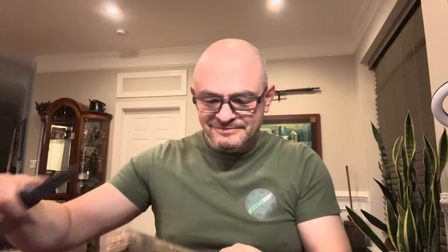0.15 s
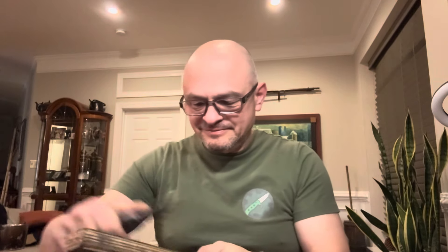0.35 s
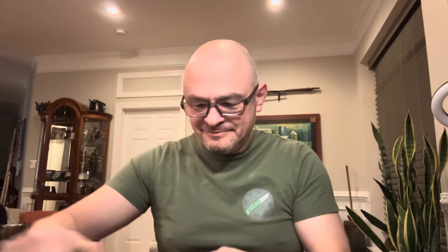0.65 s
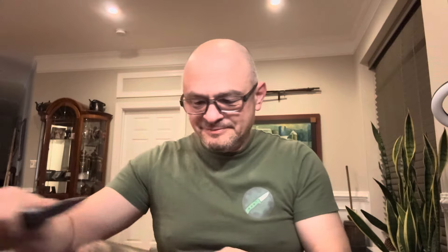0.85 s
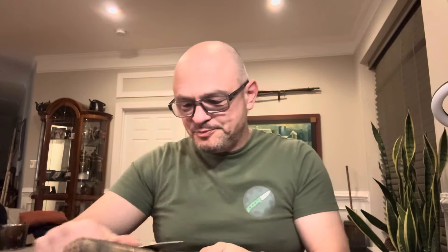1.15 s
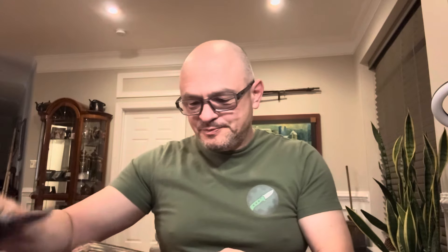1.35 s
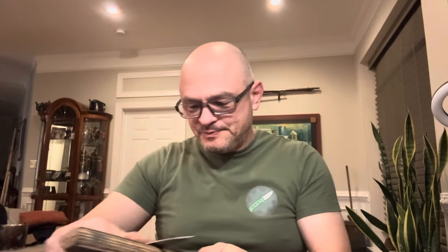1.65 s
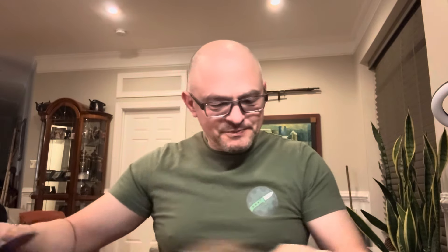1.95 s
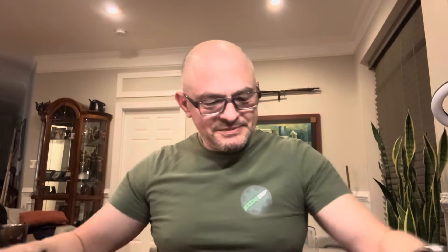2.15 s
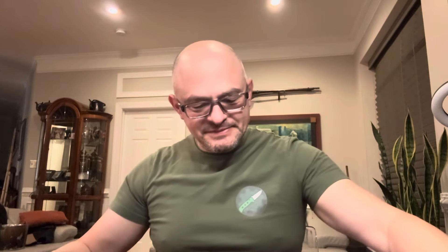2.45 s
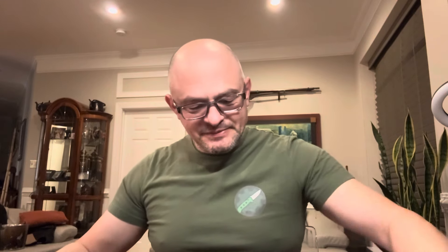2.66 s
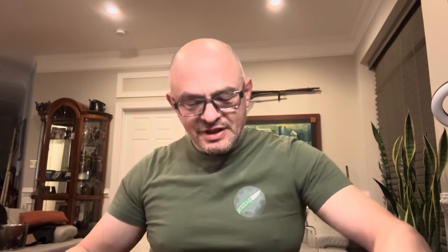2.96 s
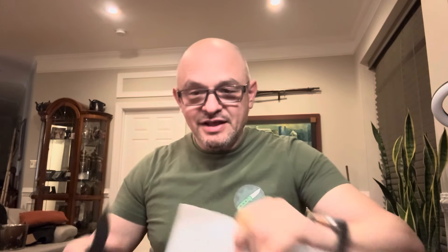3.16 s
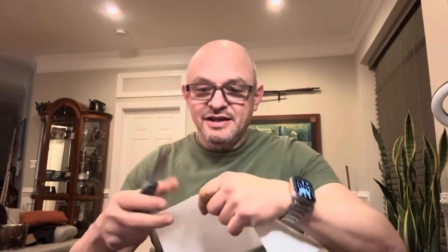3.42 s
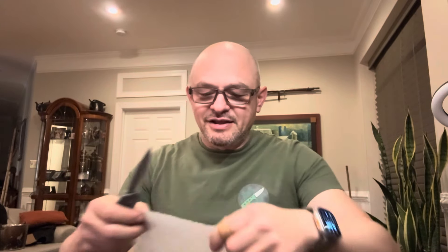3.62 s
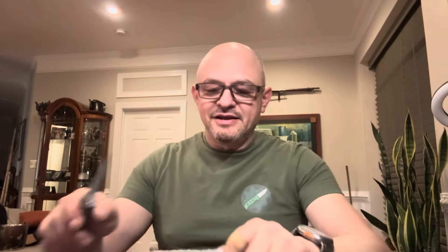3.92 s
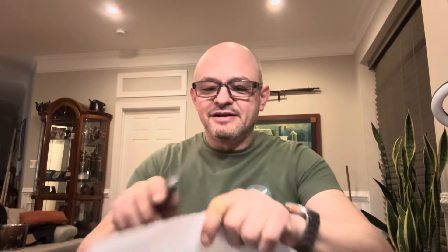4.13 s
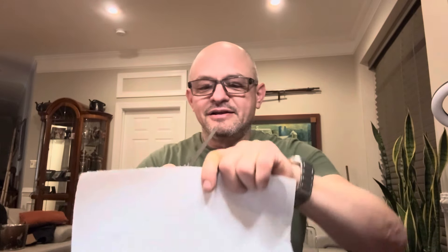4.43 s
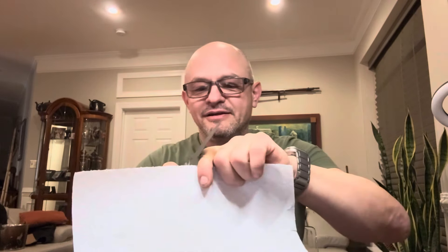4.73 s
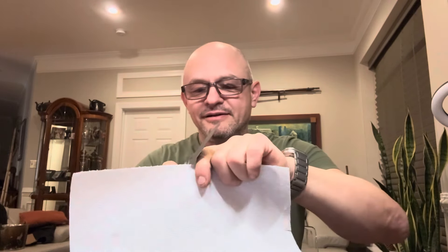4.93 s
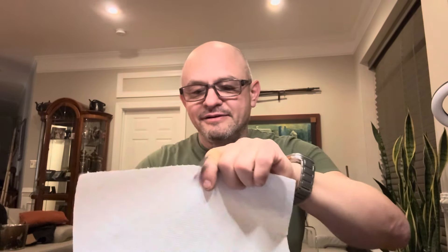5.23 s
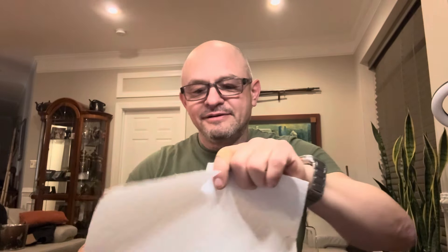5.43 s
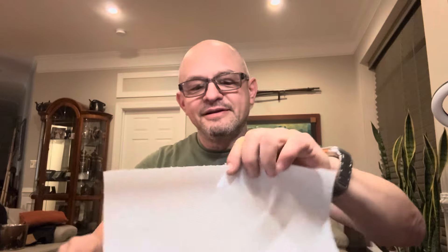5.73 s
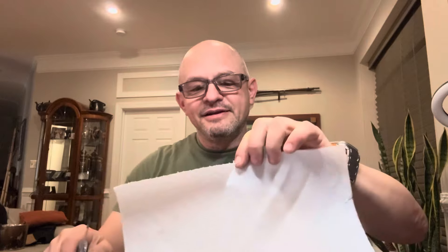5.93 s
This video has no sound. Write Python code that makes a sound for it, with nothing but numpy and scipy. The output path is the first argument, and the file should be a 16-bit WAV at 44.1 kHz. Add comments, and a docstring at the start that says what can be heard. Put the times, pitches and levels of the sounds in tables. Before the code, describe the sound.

Near stereo microphone in a furnished room: bright short blade clicks, each followed by a fine gritty hiss ending in a small flick. Then two quick wooden knocks as a block lands, heel first and edge second, with a rattle. Loose paper towel is handled in crisp crackling bursts. After a quiet gap a blade rasps through it with tiny snaps, leaving a barely audible ring over low room noise.

```python
"""A knife is stropped on a wooden block close to a two-port microphone in a quiet living room: the blade clicks
on the strop (ringing modes) and hisses along the leather (coloured grit noise). The block is put on the table,
heel then edge (struck modes), and the knife is laid down with a rattle (rattling noise). A paper towel is
picked up and rustled (clumped noise, low flapping), then nicked and sliced, with single snaps and a last
lingering ring. Room tone (noise) and a thin wavering whine (sines) lie under it all."""
import sys
import numpy as np
from scipy import signal
from scipy.fft import rfft, irfft, next_fast_len
from scipy.io import wavfile
from scipy.ndimage import uniform_filter1d

SR = 44100
rng = np.random.default_rng(int(sys.argv[2]) if len(sys.argv) > 2 else 0)


def log_audio(samples):
    """Write samples as a 16-bit WAV file to the path given in sys.argv[1]."""
    # one column per channel
    frames = np.atleast_2d(samples).T
    # limit to full scale, then quantise
    limited = np.clip(frames, -1, 1)
    pcm = np.round(limited * 32767).astype(np.int16)
    wavfile.write(sys.argv[1], SR, pcm)


def undo_db(level):
    """Turn decibels back into plain size, where 20 dB means ten times bigger."""
    steps = np.asarray(level, float) / 20
    return 10 ** steps


N = 268172
LEAD = 4410  # samples of scene before time zero

# level difference between the ports: f/Hz, left minus right/dB
PORT_LEAN = [(60, -3), (250, -3), (600, -4.5), (2000, 1), (4500, -6.5), (9000, 0.5)]


def evened(x):
    """Scales to rms 1."""
    return x / np.sqrt(np.mean(x ** 2) + 1e-20)


def read(points, hz):
    """Table value on a log-frequency axis."""
    f, value = np.transpose(points)
    return np.interp(np.log(hz + 1), np.log(f + 1), value)


def add(mix, s, sound):
    """Mixes a sound in at time s."""
    part = mix[LEAD + round(s * SR):][:len(sound)]
    part += sound[:len(part)]


def coloured(x, points, tilt_db_per_octave=0):
    """Filters by a spectrum, tilted about 3 kHz; rms 1."""
    hz = np.fft.rfftfreq(len(x), 1 / SR)
    gain_db = read(points, hz) + tilt_db_per_octave * np.log2(hz / 3000 + 0.027)
    return evened(irfft(rfft(x) * undo_db(gain_db), len(x)))


def resonate(x, hz, width_hz):
    """Moving resonance: shifts the curve hz down to zero, smooths, shifts back; rms 1."""
    turn = np.exp(2j * np.pi * np.cumsum(hz) / SR)
    pole = np.exp(-np.pi * width_hz / SR)
    smooth = signal.lfilter([1 - pole], [1, -pole], x / turn)
    return evened((turn * smooth).real)


def ring(modes, contact_s, rise_s, crack_db, crack_s, crack_hz=700):
    """Modes set going by a short blow, plus the broad crack of the contact; peak 1."""
    t = np.arange(SR // 2) / SR
    hz, db, t60_s = np.transpose(modes)[:, :, None]
    body = (undo_db(db - 60 * t / t60_s) * np.sin(2 * np.pi * hz * t)).sum(0)
    t_blow = t[:800]
    blow = t_blow * np.exp(-t_blow / contact_s)
    sound = signal.fftconvolve(body, blow)
    sound *= 1 - np.exp(-np.arange(len(sound)) / SR / rise_s)  # the parts settle into each other
    sound /= abs(sound).max()
    crack = t_blow / crack_s * np.exp(1 - t_blow / crack_s) * rng.standard_normal(800)
    high_pass = signal.butter(2, 2 * crack_hz / SR, "high")
    sound[:800] += undo_db(crack_db) * signal.lfilter(*high_pass, crack)
    return sound / abs(sound).max()


def clicks():
    """Each face of the blade weights the same modes differently; direct sound and room feed."""
    # blade clicking on the strop, at set-down or at the end of a stroke:
    # t/s, peak level/dB, face of the blade/0-1, room send/dB
    blade_clicks = [(-.012, -13, 0, -10.5), (0.3996, -15.5, 0.3, -10), (1.0177, -15, 1, -14.5),
                    (1.6124, -15, .95, -13), (1.797, -36, 0.39, -18.5)]
    # blade and block ringing: f/Hz, level on face 0/dB, level on face 1/dB, t60/s
    blade = [(317.4, -15, -16, 0.027), (716, -18, -13, 0.03), (795, -13, -11, .025),
             (994, -19, -24.5, 0.054), (1800, -16.5, -26, 0.034), (2680, 2, -18.5, 0.021),
             (2875, 8, -21.5, 0.016), (3036, -7.5, -17, 0.015), (3840, 7.5, -13, .01),
             (4200, -9, 5.5, 0.012), (4360, -15.5, 3, 0.011), (6620, -3, -4, 0.008), (7260, -2, 1, 0.007),
             (8300, -6, -3, 0.006), (9600, -6, -4, .003), (14000, -4, -11.5, 0.0025)]
    near, far = np.zeros((2, LEAD + N))
    for s, db, face, send_db in blade_clicks:
        modes = [(hz, a_db + face * (b_db - a_db), t60_s) for hz, a_db, b_db, t60_s in blade]
        sound = undo_db(db) * ring(modes, .00002, 0.0013, -3.5, 0.0011, crack_hz=2380)
        add(near, s, sound)
        add(far, s, undo_db(send_db) * sound)
    return near, far


def strokes():
    """Fine grit hiss of steel on leather: easing draw, bright flick, dull trailing brush."""
    # blade drawn over the leather: down t/s, lift t/s, draw level/dB, flick level/dB, flick length/s,
    # fading of the trailing brush/(dB/s)
    draws = [(0.418, 0.685, -55, -53.5, 0.08, 54), (1.039, 1.276, -56.5, -54, 0.083, 171),
             (1.635, 1.795, -55.5, -51, 0.01, 175)]
    # hiss spectrum before tilt: f/Hz, relative level/dB
    leather = [(59, -48), (100, 2), (315, 0.5), (452, -30.5), (818, -12), (1450, -40.5), (1910, -8.5),
               (2170, -14.5), (3250, -19), (7770, -7), (9410, -12), (11900, -6.5), (16000, -32)]
    sag_db_per_s, trail_db = 34.5, -63  # pressure eases; after the lift the blade brushes on lightly
    lift_s, trail_s = .011, .26
    # triples: at set-down, at the lift, trailing; levels relative to the hiss
    bright_share = (0.34, 1, .1)
    sing_hz, sing_db = (4060, 3060, 4340), (-16.5, -9, -10.5)  # singing of the blade
    hollow_hz, hollow_db = (800, 900, 1150), (-10, -18, -4)  # hollow of the block
    out = np.zeros(LEAD + N)
    for down_s, up_s, draw_db, flick_db, flick_s, fade_db_per_s in draws:
        t = np.arange(down_s, up_s + trail_s, 1 / SR)
        stage = lambda v: np.interp(t, (down_s, up_s, up_s + 4 * lift_s), v)
        contact = np.exp(-np.maximum(t - up_s, 0) / lift_s)
        flick = np.sin(np.pi * np.clip((t - up_s) / flick_s + 1, 0, 1) * .75) ** 2
        draw = undo_db(draw_db - sag_db_per_s * (t - down_s))
        brush = undo_db(trail_db - fade_db_per_s * (t - up_s))
        level = contact * (draw + undo_db(flick_db) * flick) + (1 - contact) * brush
        grit = rng.standard_normal(len(t)) * undo_db(0.5 * rng.exponential(1, len(t)))
        bright = stage(bright_share)
        hiss = bright * coloured(grit, leather, 0.76) + (1 - bright) * coloured(grit, leather, -4)
        hiss += undo_db(stage(sing_db)) * resonate(grit, stage(sing_hz), 500)
        hiss += undo_db(stage(hollow_db)) * resonate(grit, stage(hollow_hz), 210)
        add(out, down_s, level * hiss * signal.windows.tukey(len(t), .1))
    return out


def knocks():
    """Block on table: a soft blow favours the low table modes, a hard edge wakes all and cracks."""
    # block meeting the table: t/s, peak level before the high-pass/dB, hardness/0-1
    blows = [(2.3512, -11, 0), (2.392, -23, .2), (2.509, -17, 1), (2.547, -24, 0.2), (2.916, -50, 0.4),
             (3.921, -52.5, 0)]
    # table top ringing: f/Hz, level under a hard blow/dB, t60/s
    table_modes = [(76.6, -35.5, 0.45), (114.1, -17, 0.35), (156, -13, 0.25), (167, -7, .24), (237, 0, 0.1),
                   (273, -8, .09), (308.2, -4, 0.1), (378, -6, 0.021), (486, -8.5, .05), (646, -6, 0.06),
                   (748, -8, 0.11), (825, -2.5, 0.045), (1028, -6, .07), (1180, -16.5, 0.054),
                   (1340, -13, 0.05)]
    out = np.zeros(LEAD + N)
    for s, db, hard in blows:
        soft = 1 - hard
        modes = [(hz, d - 7 * soft * max(np.log2(hz / 260), 0), t60_s) for hz, d, t60_s in table_modes]
        add(out, s, undo_db(db) * ring(modes, .00008 + 0.00035 * soft, 0.0033, -8 - 40 * soft, 0.0025))
    return signal.lfilter(*signal.butter(2, 2 * 110 / SR, "high"), out)  # little deep bass in the blows


def clatter():
    """Knife laid down on the table rattles: dense modes as noise dying band by band."""
    # spectrum: f/Hz, relative level/dB
    clatter_colour = [(150, -11.5), (250, -23), (308, -3), (407, -27.5), (761, -10), (860, -17.5),
                      (1060, -8.5), (1580, -27.5), (2490, -27.5), (7570, -33), (8700, -34), (9490, -78),
                      (10500, -47), (13400, -44), (16000, -102)]
    # decay: f/Hz, t60/s
    clatter_decay = [(300, 0.77), (1000, 0.44), (2500, 0.43), (5000, 0.39), (12000, 0.38)]
    hz, t, z = signal.stft(coloured(rng.standard_normal(SR), clatter_colour), SR, nperseg=256)
    decay = undo_db(-60 * t / read(clatter_decay, hz)[:, None])
    tail = signal.istft(z * decay, SR, nperseg=256)[1]
    t = np.arange(len(tail)) / SR
    sharp_start = (1 - np.exp(-t / 0.00077)) * (1 + 2 * np.exp(-t / 0.021))
    out = np.zeros(LEAD + N)
    add(out, 2.508, undo_db(-32) * tail * sharp_start)
    return out


def grip():
    """Hand and sleeve shifting on the block: coloured noise of uneven strength."""
    # t/s, level/dB
    shifting = [(2.18, -102), (2.26, -72.5), (2.334, -79.5), (2.346, -53), (2.376, -75.5), (2.392, -58.5),
                (2.482, -76), (2.5, -64)]
    s, db = np.transpose(shifting)
    t = np.arange(s[0], s[-1], 1 / SR)
    uneven_db = evened(uniform_filter1d(rng.standard_normal(len(t)), 200))
    rub = rng.standard_normal(len(t)) * undo_db(uneven_db)
    rub = coloured(rub, [(500, -1), (2500, 13), (8000, 8), (15000, -11)])
    out = np.zeros(LEAD + N)
    add(out, s[0], undo_db(np.interp(t, s, db)) * rub)
    return out


def movements(rows, colour, grain_db, dies_db_per_s):
    """Clumped fibre crackle and hiss and a low flapping of the sheet while the hand moves."""
    # flapping of the sheet: f/Hz, relative level/dB
    flap_colour = [(24, -28), (40, -31), (64, -4.5), (140, -3), (266, 0), (313, 3.5), (407, -28.5),
                   (450, -17.5), (580, -50), (990, -120)]
    swell_db = 15  # a movement grows by this much as it starts
    t = np.arange(-LEAD, N) / SR
    white, slow, low = rng.standard_normal((3, len(t)))
    clumps = evened(uniform_filter1d(uniform_filter1d(slow, 150), 150))
    grains = np.minimum(rng.exponential(1, len(t)), 5)
    fibres = white * undo_db(grain_db * (0.66 * clumps + .5 * grains))
    fibres /= np.sqrt(uniform_filter1d(fibres ** 2, 4000))  # the hand sets the slow level
    flap = coloured(low, flap_colour) * undo_db(2 * evened(uniform_filter1d(slow, 900)))
    hiss = coloured(fibres, colour)
    treble = signal.lfilter(*signal.butter(1, 2 * 1500 / SR, "high"), hiss)
    out = np.zeros(len(t))
    for start, swell, end, full_db, end_db, flap_db in rows:
        db = np.interp(t, (start, start + swell, end), (full_db - swell_db, full_db, end_db))
        db -= dies_db_per_s * (np.maximum(t - end, 0) + 4 * np.maximum(start - t, 0))
        dulling = undo_db(-max(flap_db, 0)) - 1  # a slack sheet crackles less
        out += undo_db(db) * (hiss + dulling * treble + undo_db(flap_db) * flap)
    return out


def rustling_and_cutting():
    """Paper towel: loose sheet crumpling, then stretched sheet under the blade."""
    # loose sheet handled: start t/s, swell/s, end t/s, level after the swell/dB, level at the end/dB,
    # flapping bass over the rustle/dB
    rustles = [(2.74, 0.02, 2.82, -68.5, -65, 2), (2.895, .022, 2.926, -60, -60.5, 5.5),
               (2.94, 0.024, 3.05, -70, -69, 2), (3.055, .035, 3.32, -56, -61, 2.5),
               (3.335, 0.0052, 3.4, -59, -62, 7), (3.445, .06, 3.748, -58, -54.5, 0.5),
               (3.905, 0.018, 3.957, -59, -64.5, 3.5)]
    # stretched sheet nicked, sliced and eased off: same columns
    cuts = [(4.855, 0.017, 4.98, -67.5, -64, -4), (4.99, 0.034, 5.15, -62.5, -65, -7),
            (5.145, .057, 5.27, -48, -48.5, -5), (5.27, 0.012, 5.396, -50, -44.5, -4),
            (5.555, .08, 5.81, -60, -67.5, -3), (5.81, 0.018, 5.93, -74, -81.5, 7.5)]
    # spectrum of the loose sheet: f/Hz, relative level/dB
    loose_colour = [(220, -47), (380, -10.5), (424, -18), (871, -1), (1410, -18.5), (1880, -12.5),
                    (2190, -25), (2560, -12), (3970, -18), (8040, -14), (8970, -22), (9550, -37.5),
                    (11900, -23), (16000, -43)]
    # spectrum of the stretched sheet: f/Hz, relative level/dB
    stretched_colour = [(220, -43), (380, -23), (580, -17), (745, -1), (1250, -6.5), (1500, -14.5),
                        (1760, -5.5), (2090, -14.5), (2560, -8.5), (2910, -12), (3240, -10), (8420, -13.5),
                        (9550, -30), (10700, -20.5), (12900, -23), (16000, -47)]
    loose = movements(rustles, loose_colour, grain_db=4, dies_db_per_s=261)
    stretched = movements(cuts, stretched_colour, grain_db=4.5, dies_db_per_s=703)
    return loose + stretched


def snaps():
    """Creases and fibres that snap: a few fast-dying modes and a tiny crack."""
    # t/s, peak level/dB, pitch f/Hz
    breaks = [(2.913, -46, 900), (3.07, -50, 830), (3.14, -38, 1855), (3.249, -41, 830), (3.34, -34, 713),
              (3.494, -43, 673.5), (3.72, -41, 900), (4.869, -57.5, 1130), (4.914, -54, 990),
              (5.007, -55, 1340), (5.196, -42, 1060), (5.275, -35, 780), (5.369, -37, 748)]
    out = np.zeros(LEAD + N)
    for s, db, hz in breaks:
        modes = [(280, -6, .05), (hz, 0, .03), (2.02 * hz, -6, .015),
                 (4800, -8, .006), (8000, -10, .004), (12000, -12, .004)]  # f/Hz, level/dB, t60/s
        add(out, s, undo_db(db) * ring(modes, .00003, 0.00031, -5.5, 0.00038))
    return out


def lingering():
    """Lingering ring: noise through one narrow resonance."""
    # t/s, level/dB
    linger = [(5.64, -90), (5.74, -71), (5.9, -79.5), (6.08, -89.5)]
    s, db = np.transpose(linger)
    t = np.arange(s[0], s[-1], 1 / SR)
    tone = resonate(rng.standard_normal(len(t)), np.full(len(t), 1865), width_hz=70)
    out = np.zeros(LEAD + N)
    add(out, s[0], undo_db(np.interp(t, s, db)) * tone)
    return out


def ports(x, lag_samples, scatter_db):
    """Left port hears later, at its own balance; nearby things scatter the sound differently to each."""
    size = next_fast_len(len(x))
    hz = np.fft.rfftfreq(size, 1 / SR)
    half = np.exp(-1j * np.pi * hz * lag_samples / SR) * undo_db(read(PORT_LEAN, hz) / 2)
    n = np.arange(3000)
    scatter = rng.standard_normal((2, 3000)) * np.exp(-n / 600) * (n > 40)
    scatter *= undo_db(scatter_db) / np.linalg.norm(scatter, axis=1, keepdims=True)
    response = np.array([half, 1 / half]) * (1 + rfft(scatter, size))
    return irfft(rfft(x, size) * response, size)[:, :len(x)]


def room(x):
    """Sparse taps of random sign, each band dying at its own speed, other taps for each port."""
    # f/Hz, t60/s
    room_decay = [(100, 1), (400, 0.37), (1000, .55), (3000, 0.59), (6000, 0.47), (12000, 0.33)]
    taps = np.zeros((2, SR))
    at = np.arange(300, SR - 20, 20) + rng.integers(0, 20, (2, (SR - 301) // 20))
    np.put_along_axis(taps, at, rng.choice([-1., 1.], at.shape), 1)
    hz, t, z = signal.stft(taps, SR, nperseg=256)
    decay = undo_db(-60 * t / read(room_decay, hz)[:, None])
    tail = signal.istft(z * decay, SR, nperseg=256)[1]
    return signal.fftconvolve(x[None], tail / np.linalg.norm(tail[0]), axes=1)[:, :len(x)]


def air():
    """Room tone: steady noise with slow patches, partly alike at both ports."""
    # spectrum: f/Hz, relative level/dB
    air_colour = [(15, -58), (25, -21.5), (48, 3), (67, -1), (88, -19), (125, -5), (146, -12), (243, -3),
                  (383, -18.5), (691, -31.5), (769, -22), (1150, -33.5), (5280, -44), (7680, -42),
                  (15000, -49.5)]
    # f/Hz, left-right likeness/-1 to 1
    air_likeness = [(60, 0.92), (240, -0.5), (950, -0.96), (3770, 0.0), (15000, 1)]
    frames, hz = (LEAD + N) // 512 + 5, np.fft.rfftfreq(2048, 1 / SR)
    a, b, c, d, patches = rng.standard_normal((frames, 1025, 5)).T
    patches = evened(uniform_filter1d(uniform_filter1d(patches, 12, 0), 10, 1))
    same = read(air_likeness, hz)[:, None]
    left = a + 1j * b
    right = same * left + np.sqrt(1 - same ** 2) * (c + 1j * d)
    lean_db = read(PORT_LEAN, hz)[:, None] / 2 * np.array([1, -1])[:, None, None]
    z = np.array([left, right]) * undo_db(read(air_colour, hz)[:, None] + 2.0 * patches + lean_db)
    noise = signal.istft(z, nperseg=2048, noverlap=1536)[1][:, :LEAD + N]
    return undo_db(-65) * evened(noise)


def whine():
    """Thin wavering tones: sines whose level drifts by 2 dB rms."""
    # f/Hz, rms level before wavering/dB
    tones = [(7564, -101), (8043, -103)]
    t = np.arange(LEAD + N) / SR
    waver = evened(uniform_filter1d(rng.standard_normal((len(tones), len(t))), 3000, axis=1))
    out = np.zeros(len(t))
    for (hz, db), w in zip(tones, waver):
        out += np.sqrt(2) * undo_db(db + 2 * w) * np.sin(2 * np.pi * hz * t)
    return out


def scene():
    """Direct sounds through the ports, one shared room, room tone and whine."""
    near, far = clicks()
    hiss = strokes()
    wood = knocks() + clatter() + grip()
    paper = rustling_and_cutting() + snaps() + lingering()
    direct = ports(near + hiss, lag_samples=2.43, scatter_db=-9.5)
    direct += ports(wood, lag_samples=15.5, scatter_db=-7.5)
    direct += ports(paper, lag_samples=3.43, scatter_db=-5.5)
    wet = room(far + undo_db(-15) * hiss + undo_db(-11.5) * wood + undo_db(-18) * paper)
    return (direct + wet + air() + whine())[:, LEAD:]


def low_pass(x):
    """Removes everything above the highest recorded frequency."""
    return signal.sosfilt(signal.butter(12, 16550, fs=SR, output="sos"), x)


def record(dry):
    """Bass roll-off of the microphone, then treble shaping: a dip near 9.6 kHz and an upper cutoff."""
    # treble shaping of the whole mix: f/Hz, gain/dB
    treble_shape = [(8300, 2.5), (8900, 0), (9600, -9), (10400, -1.5), (11000, 0.5), (13600, 2.5),
                    (14600, -14.5), (16000, -11.5), (16600, -49.5)]
    hz = np.linspace(0, SR / 2, 257)
    taps = signal.firwin2(255, hz, undo_db(read(treble_shape, hz)), fs=SR)
    thin = signal.lfilter(*signal.butter(2, 2 * 52 / SR, "high"), dry)
    return low_pass(signal.oaconvolve(thin, taps[None], "same"))


dry = scene()
out = record(dry)
log_audio(out)
```